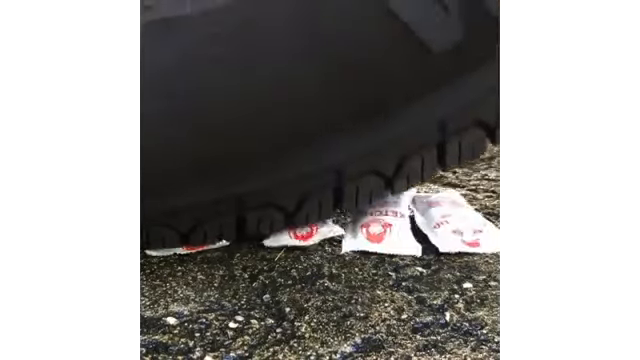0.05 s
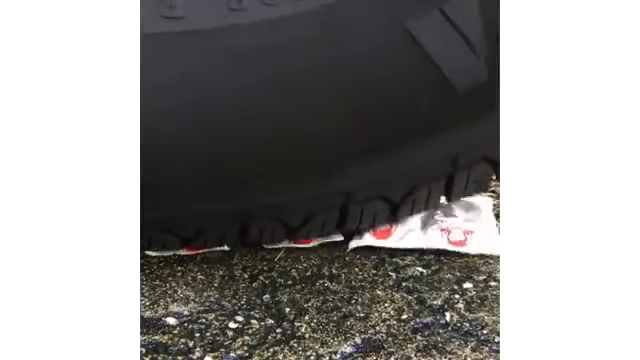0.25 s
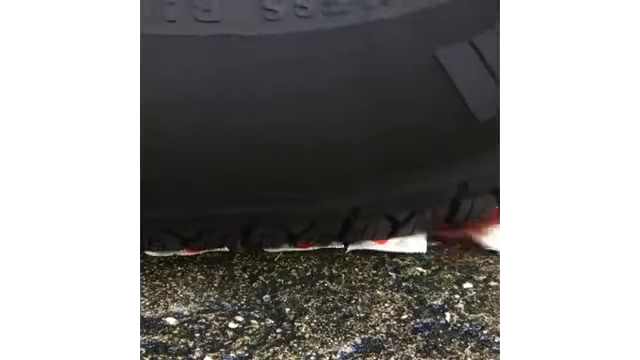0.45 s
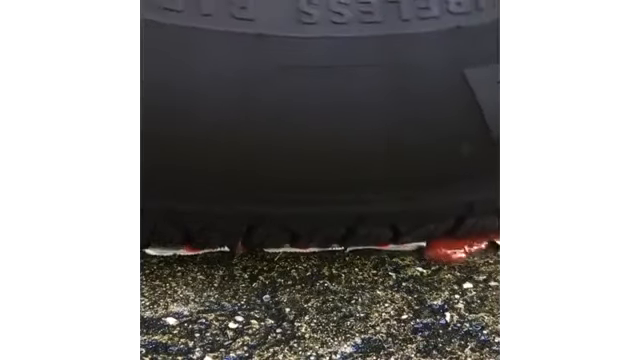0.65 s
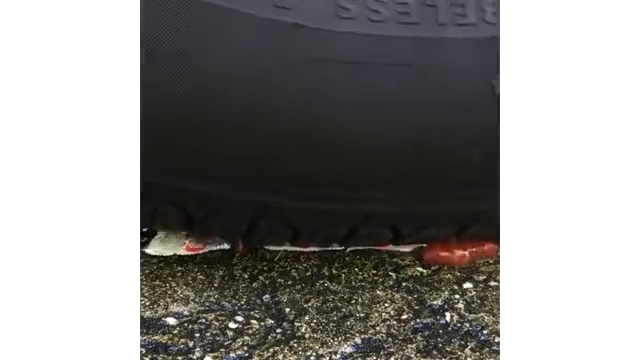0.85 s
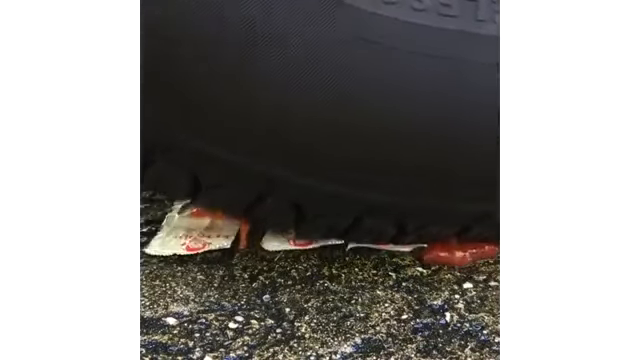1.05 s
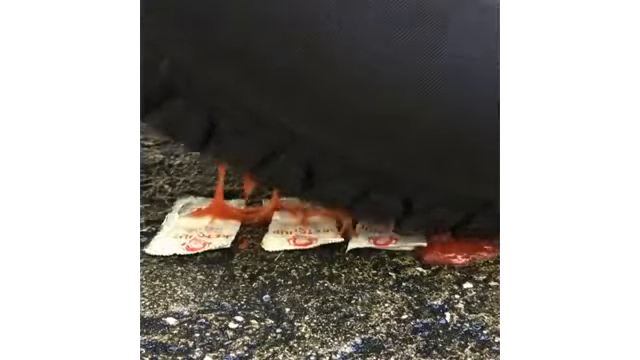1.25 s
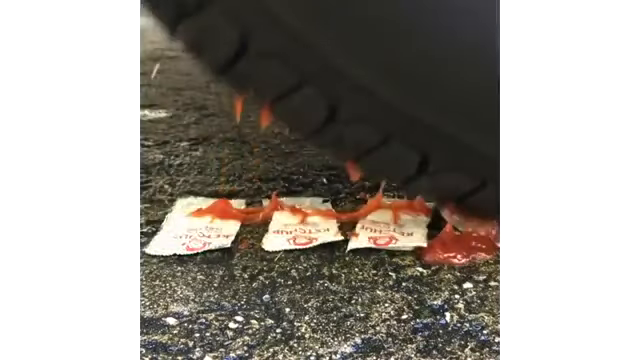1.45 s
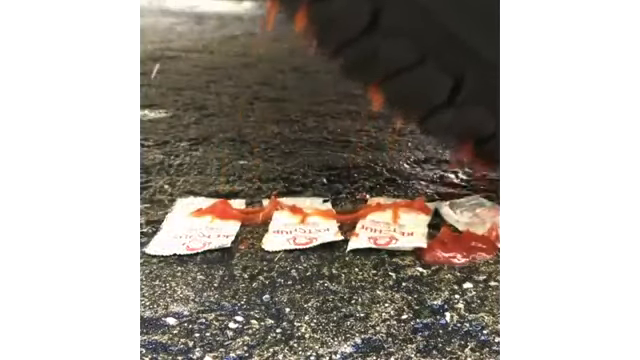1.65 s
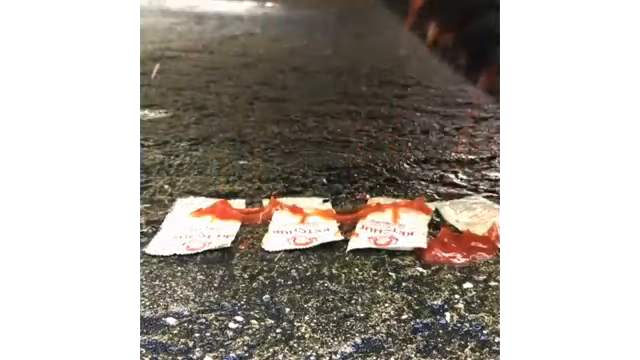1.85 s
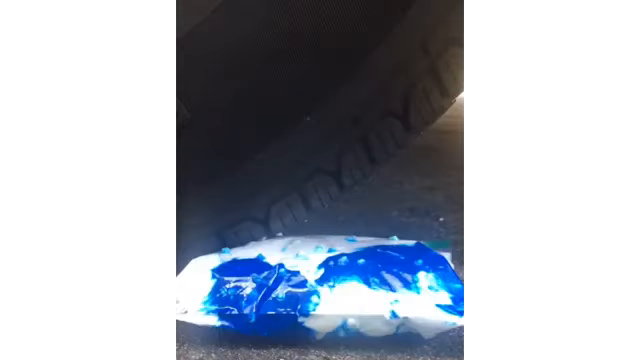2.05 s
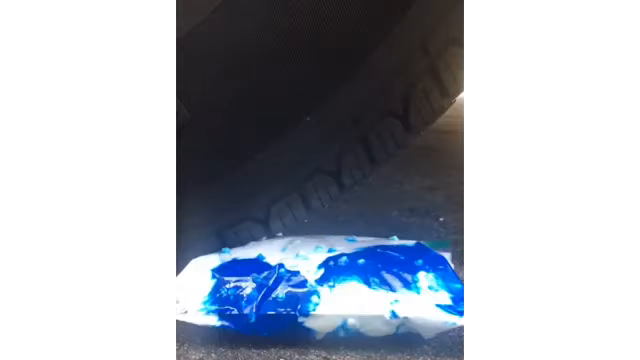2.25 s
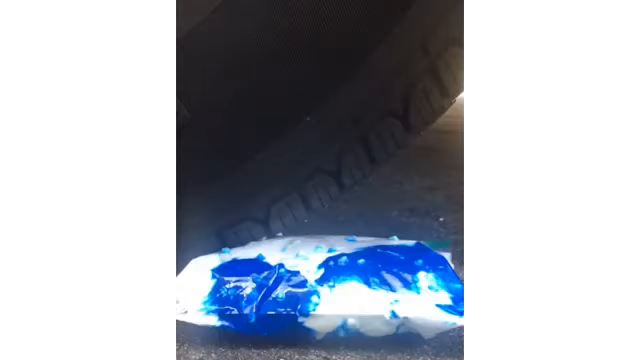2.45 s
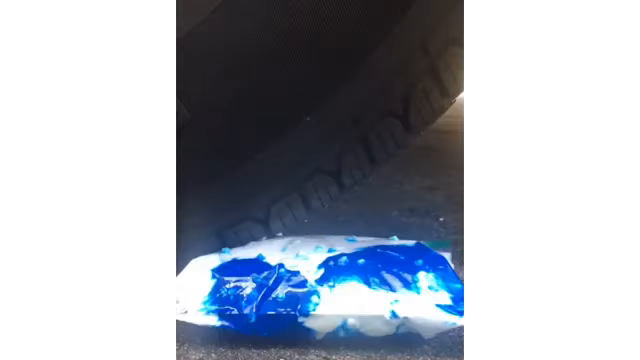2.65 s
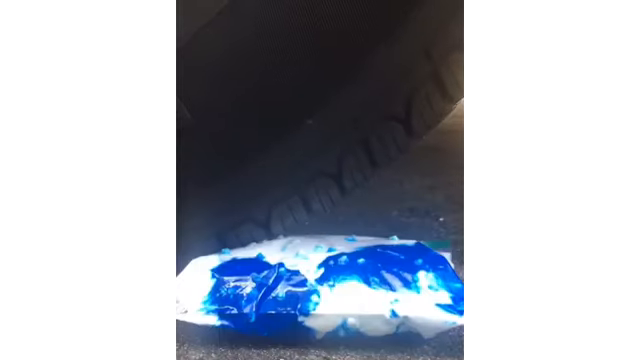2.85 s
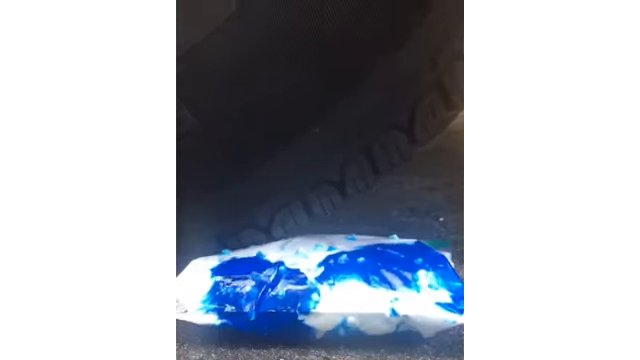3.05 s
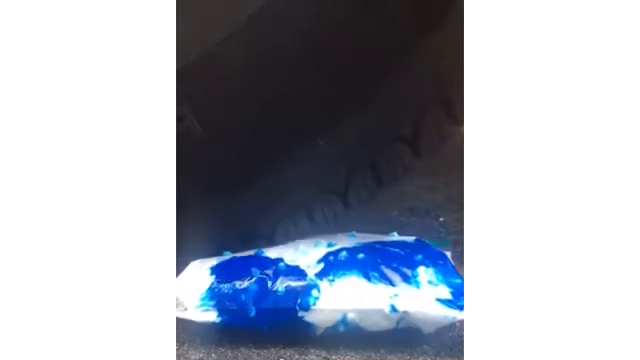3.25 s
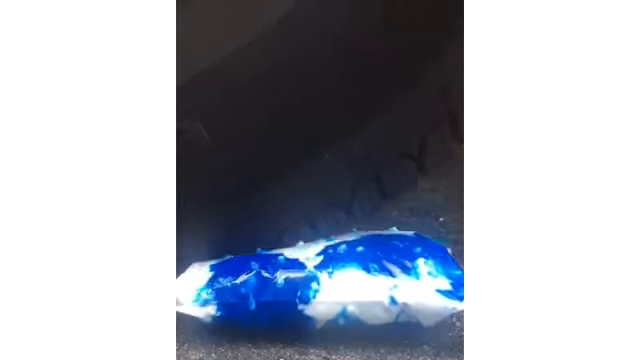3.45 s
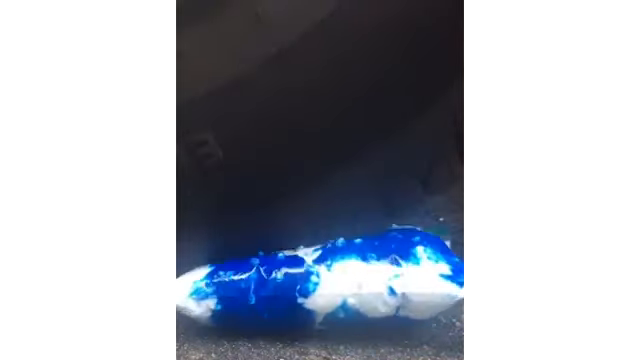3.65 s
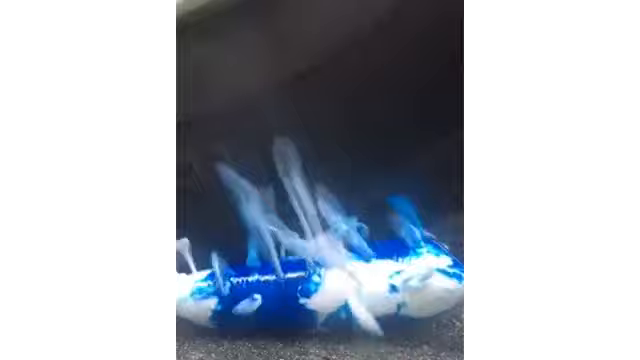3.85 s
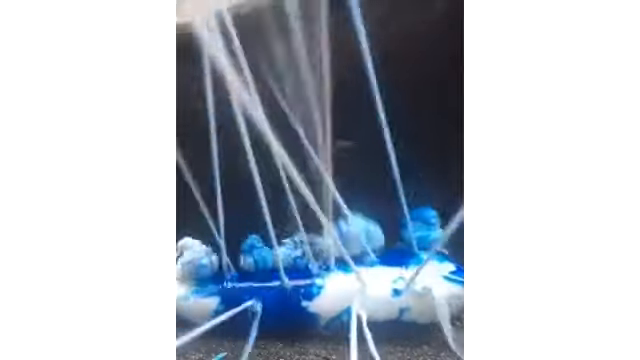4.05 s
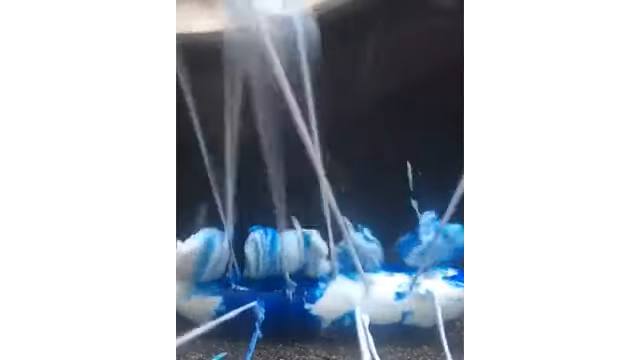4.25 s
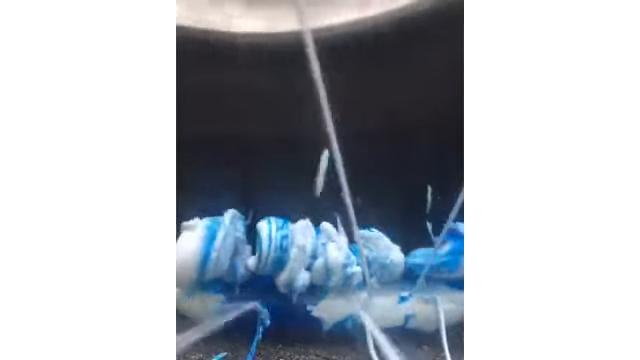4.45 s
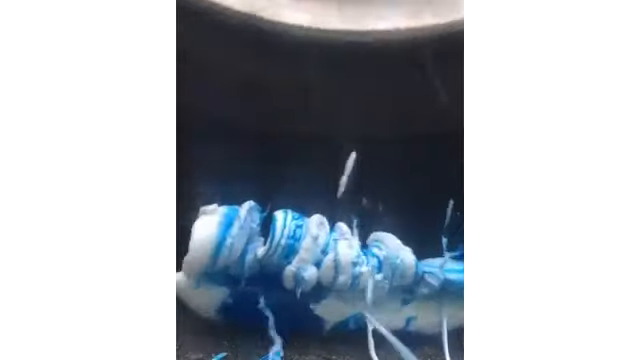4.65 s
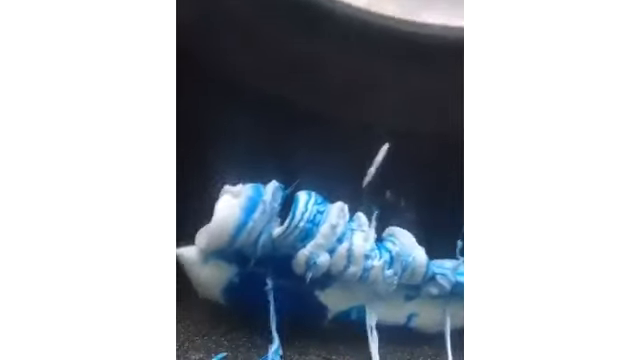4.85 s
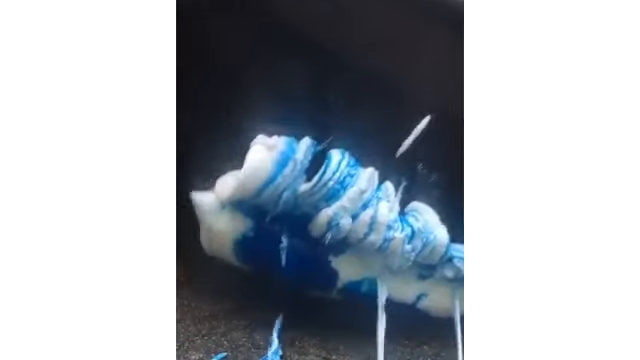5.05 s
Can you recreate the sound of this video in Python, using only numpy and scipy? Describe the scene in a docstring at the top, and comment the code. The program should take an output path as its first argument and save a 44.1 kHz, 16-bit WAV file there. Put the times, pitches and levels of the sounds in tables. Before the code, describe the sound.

Outdoor, close to the road, dry, with low rumble and fine wet tread hiss throughout. At 0 s a sachet splats with a soft thump and short spit. Crisp foil and grit ticks follow, strongest around 0.24 and 0.40 s, with a tearing burst at 0.24. At 0.49 a hard crack, splat and deep short thump is the loudest pop; another softer burst comes at 0.86 amid sharp snaps. From 1 to 2.1 s only faint wet crackle and rumble remain. A near-silent cut falls at 2.1. The second scene is quiet until car-body jolts: a scraping knock at 2.6 to 2.8, hollow low knocks at 3.0 to 3.2. Crackling bubble ticks build from 3.45. At 3.84 foam erupts in bright, harsh hissing jets, sputtering and surging, strong spurts at 4.15 to 4.4 and 4.52, thinning to stop by 4.74. A faint low thud and quiet rumble end it at about 5.1.

```python
"""Grit and foil tick as a car tyre rolls slowly over sauce sachets on wet asphalt; the sachets burst and splat.
After a cut the car jolts into motion and squeezes a pierced foam-filled tube, which crackles, then sprays jets
that spit and choke. Low outdoor rumble and a fine wet hiss lie under both scenes.
Rumble, hiss, splats and jets are shaped noise; ticks are short rings with snaps; thumps are falling sines;
jolts, and a last faint low thud, ring a set of car-body modes and add a noise scrape."""
import sys
import numpy as np
from scipy import signal
from scipy.fft import rfft, irfft
from scipy.io import wavfile
from scipy.ndimage import uniform_filter1d

SR = 44100
rng = np.random.default_rng(int(sys.argv[2]) if len(sys.argv) > 2 else 0)


def materialize(psi):
    """Save the field psi as 16-bit PCM at rate SR to the path in sys.argv[1].

    A 1-D psi becomes a single channel; in a 2-D psi each row is a channel.
    """
    bounded = np.clip(np.atleast_2d(psi).T, -1, 1)
    quanta = np.round(bounded * 32767).astype(np.int16)
    wavfile.write(sys.argv[1], SR, quanta)


N = 225212

# near-silent join between the two scenes: start_s, end_s
CUT_S = (2.098, 2.119)


def amp(db):
    """Decibels to gain."""
    return 10 ** (np.asarray(db) / 20)


def evened(x):
    """Scales to rms 1."""
    return x / np.sqrt(np.mean(x ** 2) + 1e-20)


def read(points, hz):
    """Interpolates a spectrum table on a log-frequency axis."""
    f, value = np.transpose(points)
    return np.interp(np.log(hz + 1), np.log(f + 1), value)


def curve(rows, column=1):
    """One column of a time table at every sample."""
    rows = np.array(rows)
    return np.interp(np.arange(N) / SR, rows[:, 0], rows[:, column])


def add(mix, start_s, sound):
    """Mixes a sound in at start_s, cut off at the end of the mix."""
    part = mix[max(round(start_s * SR), 0):][:len(sound)]
    part += sound[:len(part)]


def octaves(hz, from_hz):
    """Signed distance in octaves."""
    return np.log2((hz + 1) / from_hz)


def coloured(x, shape_db):
    """Filters x by a function of frequency in dB, to rms 1."""
    hz = np.fft.rfftfreq(len(x), 1 / SR)
    return evened(irfft(rfft(x) * amp(shape_db(hz)), len(x)))


def grains(size, grainy_db, clump=30):
    """Dense tiny impacts whose strength comes in short clumps (clump in samples)."""
    clumps = uniform_filter1d(rng.standard_normal(size), clump)
    clumps = evened(uniform_filter1d(clumps, clump))
    return rng.standard_normal(size) * amp(grainy_db * np.clip(clumps, -3, 1.6))


def tread_db():
    """Level of the wet tread at every sample; it starts afresh after the cut."""
    # wet rolling hiss, a list of parts: time_s, level_db
    tread_parts = [
        [(0.0, -44), (0.13, -54), (0.41, -46.5), (0.58, -51), (0.98, -56.5), (1.89, -55), (2.1, -59)],
        [(2.12, -70.5), (2.758, -71), (3.13, -67), (3.19, -56), (3.288, -69), (3.76, -52.5)],
        [(4.72, -50), (4.828, -58), (5.1, -58)],
    ]
    return curve([row for part in tread_parts for row in part])


def air():
    """Outdoor rumble of each scene and fine hiss of the wet tread, both shaped noise, parted by the cut."""
    # outdoor air by the sachets: freq_hz, relative_db_per_hz
    sachets_air = [(15, -42.5), (25, -15.5), (86, -2), (248, -15.5), (362, -19.5), (388, -31), (528, -27),
                   (1500, -43), (1950, -71.5), (3300, -120)]
    # outdoor air by the tube: freq_hz, relative_db_per_hz
    tube_air = [(15, -48), (25, -2.5), (98, -5.5), (146, -2), (245, -16), (300, -11.5), (525, -29),
                (1060, -31.5), (3000, -52), (3900, -97), (6600, -120)]
    # rumble: time_s, level_db
    rumble_level = [(0.0, -37.5), (0.41, -39), (0.58, -56.5), (0.85, -48.5), (1.04, -41), (3.07, -41.5),
                    (3.19, -34.5), (3.35, -40.5), (4.4, -44.5), (5.1, -41)]
    # wet tread hiss: freq_hz, relative_db_per_hz
    tread_colour = [(410, -18.5), (700, -2), (1030, -4), (2110, -4), (6440, -12), (14000, -21)]
    t = np.arange(N) / SR

    def outdoor(spectrum):
        """Noise in one air spectrum, falling a further 12 dB per octave below 44 Hz."""
        return coloured(rng.standard_normal(N),
                        lambda hz: read(spectrum, hz) + 12 * np.minimum(octaves(hz, 44), 0))

    first, second = outdoor(sachets_air), outdoor(tube_air)
    rumble = np.where(t < CUT_S[1], first, second) * amp(curve(rumble_level))
    hiss = coloured(grains(N, grainy_db=2.0, clump=150), lambda hz: read(tread_colour, hz))
    hiss *= amp(tread_db())
    in_cut = (t > CUT_S[0]) & (t < CUT_S[1])
    join = uniform_filter1d(np.where(in_cut, .03, 1.), size=60)
    return (rumble + hiss) * join


def tick(level_db, hz, snap):
    """A brief ring and a broad snap with its echo off the road, in a short scatter that swells first."""
    t = np.arange(500) / SR - .0008
    after = np.maximum(t, 0)
    swing = after / (0.00015 + 0.47 / hz)  # small stiff bits ring for more cycles
    ring = np.sin(2 * np.pi * hz * t) * (swing * np.exp(1 - swing)) ** 1.12

    def pulse(u):
        """Pulse with a negative dip on each side."""
        return (1 - u ** 2) * np.exp(-u ** 2 / 2)

    direct = pulse((t - .0001) / .00004)
    echo = -.5 * pulse((t - .0004) / .00006)
    resonance = [1, -1.5 * np.cos(2 * np.pi * hz / SR), 0.7 ** 2]
    scatter = evened(signal.lfilter([1, -.7], resonance, rng.standard_normal(len(t))))
    scatter *= 0.22 * np.exp(-after / 0.002 + np.minimum(t, 0) / 0.00026)
    snap = np.clip(snap, 0, 1)
    sound = (1 - snap) * ring + snap * (direct + echo) + scatter
    # too small to move low air
    return amp(level_db) * signal.lfilter(*signal.butter(2, 750, "high", fs=SR), sound)


def crackle():
    """Random faint ticks, about 130 per second, at eight pitches; they follow the tread level."""
    strength = amp(6.4 * np.minimum(rng.exponential(1, N), 2.5))
    strength = strength * (rng.random(N) < 130 / SR)
    which, out = rng.integers(0, 8, N), np.zeros(N)
    for k, hz in enumerate(np.geomspace(1800, 11000, num=8)):
        out += signal.oaconvolve(strength * (which == k), tick(0, hz, 0.26))[:N]
    t = np.arange(N) / SR
    working = (t < CUT_S[0]) | (t > 3.4)
    return out * amp(tread_db() + 3.5) * working


def jolt(boom_db, near_hz, spread_octaves, scrape_db, rise_s, dull_db):
    """A rough noise scrape; body modes near the struck pitch ring, the low ones swelling slowly."""
    # modes of the car body: nominal_hz, relative_db, t60_s
    body_modes = [(61.3, -3, 0.91), (77.4, 8.5, 0.31), (108.4, 3, 0.28), (150.4, 2, 0.24),
                  (202.3, -1.5, 0.24), (263.6, -9, 0.6), (292, -16, 0.67), (373.5, -4, 0.16),
                  (464, -8.5, 0.27), (602, -16.5, 0.46), (693, -8.5, 0.17), (950, -20, 0.65),
                  (1264, -10, 0.24), (1430, -11, 0.24), (1676, -6, 0.3)]
    # scrape: freq_hz, relative_db_per_hz
    scrape_colour = [(180, -41), (300, -1), (649, -8.5), (1320, -8), (2400, -9), (2990, -13.5),
                     (4060, -12.5), (14000, -26)]
    t = np.arange(SR // 2) / SR
    boom = np.zeros(len(t))
    for (hz, db, t60_s), (detune, phase) in zip(body_modes, rng.random((len(body_modes), 2))):
        swell = np.clip(t / (0.34 * rise_s + 2.56 / hz), 0, 1) ** 2  # a few cycles to build
        struck_db = db - 6 * (octaves(hz, near_hz) / spread_octaves) ** 2
        mode = np.sin(2 * np.pi * (hz * (.97 + 0.0608 * detune) * t + phase))
        boom += amp(struck_db - 60 * t / t60_s) * swell * mode
    wobble = uniform_filter1d(rng.standard_normal(len(t)), size=300)
    rattle = amp(3.9 * evened(uniform_filter1d(wobble, size=300)))
    scrape = coloured(grains(len(t), grainy_db=0.5, clump=80),
                      lambda f: read(scrape_colour, f) - dull_db * octaves(f, 1000))
    scrape_t60_s = 0.19 + 0.0282 * dull_db  # a duller scrape lasts longer
    fade_db = scrape_db - 60 * np.maximum(t - rise_s, 0) / scrape_t60_s
    scrape *= np.clip(t / rise_s, 0, 1) ** 2 * amp(fade_db)
    return amp(boom_db) * boom * rattle + scrape


def burst(crack_db, tear_s, splat_db, thump_db, shake_db):
    """The seam tears, sauce splats out, and the tyre drops with a thump of falling pitch and shakes on."""
    # tearing seam: freq_hz, relative_db_per_hz
    crack_colour = [(290, -44), (500, -6.5), (3470, -11.5), (7370, -13.5), (9480, -11.5), (14000, -28)]
    # splatting sauce: freq_hz, relative_db_per_hz
    splat_colour = [(180, -32), (300, -14.5), (544, -19), (1450, -14.5), (2200, -6), (3240, -10),
                    (9220, -23.5), (14000, -27.5)]
    splat_t60_s, shake_t60_s = 0.2, 0.18
    # a harder thump is lower and shorter
    thump_hz = 37 - 1.4 * thump_db
    thump_t60_s = 0.0907 - 0.0033 * thump_db
    t = np.arange(SR // 2) / SR

    tear = np.sin(np.pi * np.clip(t / tear_s, 0, 1) ** .6)
    crack = coloured(grains(len(t), grainy_db=3.0, clump=20), lambda f: read(crack_colour, f)) * tear
    splat = coloured(grains(len(t), grainy_db=2.0, clump=60), lambda f: read(splat_colour, f))
    splat *= amp(splat_db - 60 * t / splat_t60_s) * np.clip(t / tear_s, 0, 1)

    drop_s = np.maximum(t - .0014, 0)  # the tyre follows the tear
    falling_hz = thump_hz * (1 + 2.4 * np.exp(-drop_s / .007))  # the patch of rubber slackens
    turns = np.cumsum(falling_hz * (drop_s > 0)) / SR
    thump = amp(thump_db - 60 * t / thump_t60_s) * np.sin(2 * np.pi * turns)
    thump *= np.clip(drop_s / 0.0017, 0, 1)

    shake = coloured(rng.standard_normal(len(t)), lambda f: -3.5 * octaves(f, 120) ** 2)
    shake *= amp(shake_db - 60 * t / shake_t60_s) * np.clip(t / 0.0051, 0, 1)
    return amp(crack_db) * crack + splat + thump + shake


def jets():
    """Foam hisses from many holes; the balance of fine (brighter) and wide (duller) jets drifts."""
    # steady jets: time_s, level_db, fine_over_wide_db
    jet_rows = [(3.836, -18.5, 0), (3.93, -26, 15), (4.14, -27.5, 2.5), (4.235, -25, 1), (4.26, -31.5, 6.5),
                (4.31, -34, 3), (4.42, -22, -4.5), (4.52, -36.5, 7), (4.57, -31.5, 3.3), (4.63, -41.5, 18),
                (4.71, -40, 10.5), (4.74, -76, 10)]
    # foam hiss: freq_hz, relative_db_per_hz
    jet_colour = [(350, -34.5), (600, -23.5), (1410, -23.5), (2430, -7.5), (2960, -9.5), (6780, -4),
                  (7940, -4), (14000, -1)]

    def hiss(tilt_db_per_octave):
        """Grainy noise in the jet colour, tilted about 6 kHz."""
        return coloured(grains(N, grainy_db=1.5, clump=50),
                        lambda f: read(jet_colour, f) + tilt_db_per_octave * octaves(f, 6000))

    fine, wide = hiss(4.0), hiss(-4.0)
    balance = amp(curve(jet_rows, column=2))
    t = np.arange(N) / SR
    flowing = (t > jet_rows[0][0]) & (t < jet_rows[-1][0])
    blend = (balance * fine + wide) / np.sqrt(1 + balance ** 2)
    return blend * amp(curve(jet_rows)) * flowing


def spurt(length_s, start_db, end_db, hz, width_octaves, gurgle_db):
    """Spitting noise round the pitch of the hole, with a lower gurgle; it opens, flows and chokes."""
    opening_s, choking_t60_s = 0.0051, 0.043
    t = np.arange(round((length_s + .1) * SR)) / SR

    def hole(f):
        """Peak at the hole's pitch over a broad hiss."""
        distance = octaves(f, hz)
        return -np.minimum(6 * (distance / width_octaves) ** 2, 19 + 4.5 * abs(distance))

    drive = grains(len(t), grainy_db=3, clump=22)
    gurgle = coloured(drive, lambda f: -6 * (octaves(f, 2050) / 0.55) ** 2)
    spit = coloured(drive, hole) + amp(gurgle_db) * gurgle
    flow_db = start_db + (end_db - start_db) * np.minimum(t / length_s, 1)
    flow_db -= 60 * np.maximum(t - length_s, 0) / choking_t60_s
    return spit * amp(flow_db) * np.clip(t / opening_s, 0, 1)


def sputter(x, patchy_db):
    """Holes widen and clog at random, so patches of pitch swell and sink."""
    z = signal.stft(x, nperseg=256, noverlap=192)[2]
    patches = rng.standard_normal(z.shape[::-1]).T
    patches = uniform_filter1d(patches, size=5, axis=0)  # across frequency
    patches = evened(uniform_filter1d(patches, size=24, axis=1))  # along time
    out = signal.istft(z * amp(patchy_db * patches), nperseg=256, noverlap=192)[1][:N]
    return out * np.std(x) / np.std(out)


def scene():
    """All sources close to one microphone on the road."""
    # grit, foil and bubble ticks: start_s, level_db, ring_hz, snap_share (0-1)
    ticks = [(0.1501, -27, 2840, 0), (0.157, -25, 3130, 0.05), (0.2074, -14, 2860, 0.37),
             (0.2413, -0.5, 2560, 0.08), (0.2761, -13, 2050, 0), (0.2914, -16, 1890, 0.5),
             (0.3065, -24, 5500, 0.2), (0.311, -12.5, 2290, 0), (0.319, -20, 2600, 0),
             (0.3302, -20.5, 2190, 0.6), (0.341, -26, 3200, 0.2), (0.345, -25.5, 2050, 0.05),
             (0.3525, -16.5, 6630, 0.66), (0.377, -16, 3430, 0.3), (0.384, -26, 3000, 0.2),
             (0.3968, -14, 2290, 0.5), (0.4001, 0, 5350, 0.5), (0.4309, -26, 3160, 0),
             (0.4467, -13.5, 2570, 0.42), (0.4698, -24, 2440, 0.9), (0.5738, -18.5, 3360, 0.5),
             (0.7, -25, 5790, 0.46), (0.784, -27, 4280, 0), (0.796, -24, 3200, 0.15),
             (0.817, -4.5, 3480, 0.8), (0.8618, -3, 2490, 0.33), (1.2345, -25, 3320, 0.66),
             (1.259, -25, 2610, 0.57), (1.4284, -28, 6160, 0.33), (1.6402, -24, 3500, 0.7),
             (1.6584, -20, 3600, 0.44), (3.4568, -27, 2220, 0.9), (3.535, -32.5, 1500, 0.47),
             (3.5462, -23.5, 1850, 0.52), (3.6071, -26, 2240, 0.64), (3.6742, -30, 1620, 0.9),
             (3.686, -23, 1510, 0.87), (3.7642, -29, 2170, 0.8), (3.7785, -23.5, 1520, 0.84),
             (3.79, -25, 1290, 0.35), (3.8067, -19, 2000, 0.37), (3.819, -14, 5100, 0.75),
             (4.021, -11, 11500, 0.2), (4.4389, -5, 2000, 0.83), (4.579, -9.5, 10700, 0.22),
             (4.6132, -13.5, 11300, 0.2), (4.621, -16, 11800, 0.2), (4.6463, -23, 12500, 0.2),
             (4.657, -19, 11000, 0.26), (4.6781, -17, 12600, 0.36), (4.7344, -30, 2440, 0.1),
             (4.778, -32, 7100, 0), (4.8062, -30.5, 1890, 0.04)]
    # jolts of the car, and a last faint low thud:
    # start_s, boom_db, near_hz, spread_octaves, scrape_db, rise_s, dullness_db_per_octave
    jolts_and_thud = [(2.58, -33, 353, 1.9, -35.5, 0.0015, 2), (2.701, -14.5, 447, 0.83, -20, .02, -0.7),
                      (2.719, -22.5, 75, 0.8, -31.5, 0.052, 6.5), (2.789, -24, 129, 0.89, -29, 0.0078, 2.5),
                      (2.975, -43.5, 900, 1, -46.5, 0.011, 3), (3.043, -25, 317, 1.26, -42, 0.0062, 4),
                      (3.097, -13, 312, 0.099, -46, 0.033, 8.5), (3.191, -24, 248, 1.9, -30, 0.016, 6),
                      (4.775, -29, 62.6, 0.3, -51, 0.015, 3.5)]
    # bursting sachets: start_s, crack_db, tear_s, splat_db, thump_db, shake_db
    bursts = [(0.0, -40, 0.0012, -22, -15, -16), (0.239, -15, 0.0099, -28, -25, -19.5),
              (0.493, -3, .0015, -15.5, -1, -28), (0.86, -15, 0.01, -20.5, -20.5, -19)]
    # trapped air, sauce or foam spitting through a hole; the gurgle is in the gap under the tyre:
    # start_s, end_s, start_db, end_db, centre_hz, width_octaves, gurgle_db (relative)
    spurts = [(0.008, 0.103, -22.5, -46, 2380, 0.34, -8), (0.255, 0.386, -42, -48.5, 2780, 0.6, -6),
              (0.835, 0.859, -48.5, -32, 3460, 1.1, -17.5), (1.912, 1.972, -52, -52.5, 6430, 0.58, -24),
              (3.047, 3.091, -48, -54, 5630, 0.18, -2), (3.837, 3.878, -21.5, -16.5, 6500, 0.5, -22.5),
              (3.923, 3.974, -24.5, -27, 11630, 0.81, -26.5),
              (4.019, 4.049, -23.5, -27, 11400, 0.44, -18.5), (4.151, 4.228, -18, -12.5, 7000, 0.8, -15.5),
              (4.316, 4.339, -18, -16, 9130, 0.4, -25.5), (4.341, 4.382, -37, -16, 12730, 0.5, -19),
              (4.379, 4.41, -12, -24, 13060, 0.3, -19), (4.391, 4.411, -26, -23.5, 4000, 0.96, 3),
              (4.416, 4.452, -28.5, -29.5, 11000, 1.3, -8), (4.523, 4.544, -14.5, -13.5, 12400, 0.8, -25)]
    mix = air() + crackle()
    for start_s, *row in ticks:
        add(mix, start_s, tick(*row))
    for start_s, *row in jolts_and_thud:
        add(mix, start_s, jolt(*row))
    for start_s, *row in bursts:
        add(mix, start_s, burst(*row))
    wet = jets()
    for start_s, end_s, *row in spurts:
        add(wet, start_s, spurt(end_s - start_s, *row))
    return (mix + sputter(wet, patchy_db=1.73))[None]


def record(dry):
    """Dips of the microphone's place by the road, a soft ceiling, then a steep treble limit."""
    # dips: centre_hz, width_hz, depth_db
    notches = [(838, 28, -6.5), (2796, 180, -9), (10550, 340, -8)]
    hz = np.fft.rfftfreq(N, 1 / SR)
    dips_db = sum(db / (1 + (2 * (hz - f) / width) ** 2) for f, width, db in notches)
    heard = irfft(rfft(dry) * amp(dips_db), N)
    heard = .9 * np.tanh(heard / .9)  # keeps the highest peaks below full scale
    lowpass = signal.firwin(511, 14050, window=("kaiser", 9), fs=SR)  # cutoff in Hz
    return signal.oaconvolve(heard, lowpass[None], "same")


dry = scene()
out = record(dry)
materialize(out)
```